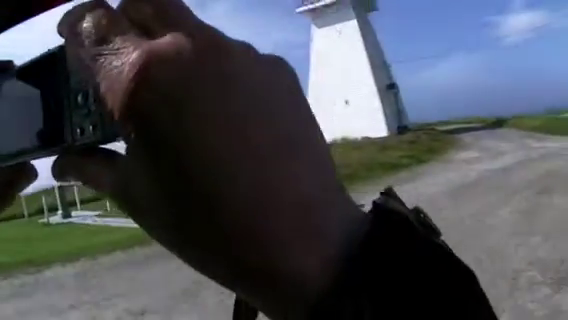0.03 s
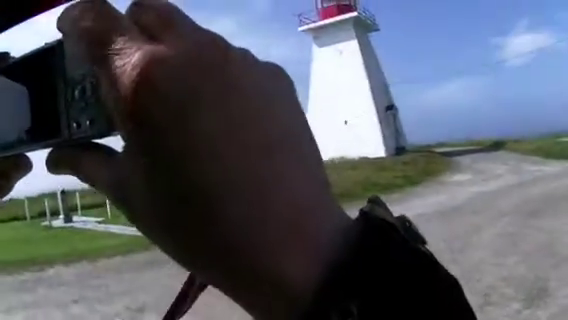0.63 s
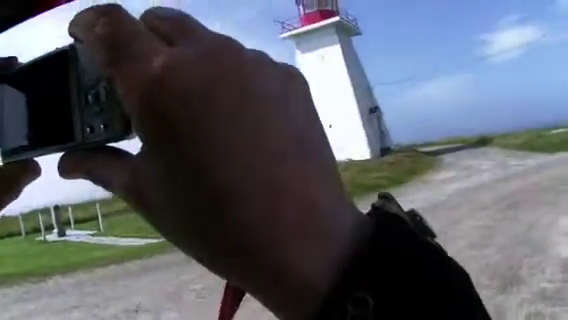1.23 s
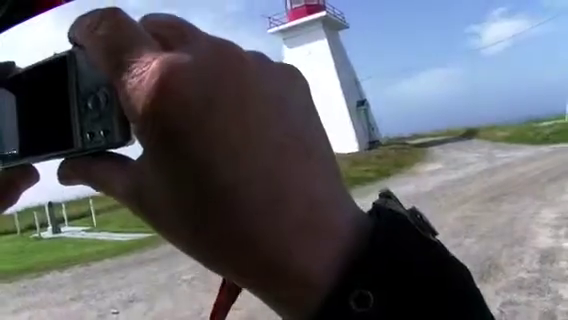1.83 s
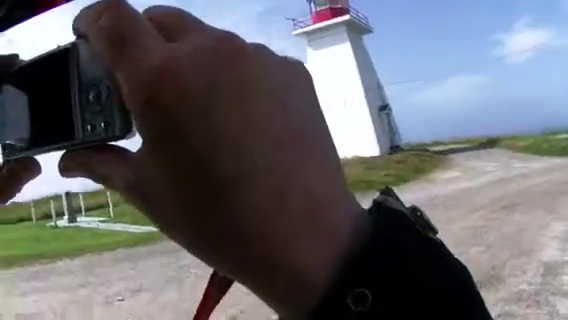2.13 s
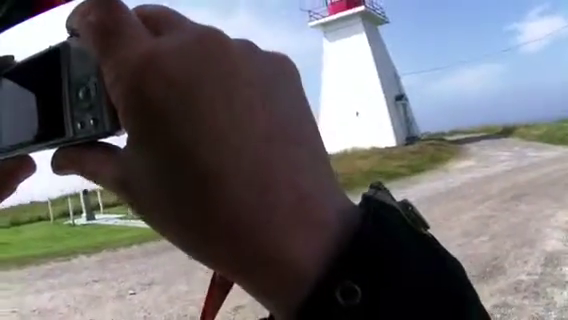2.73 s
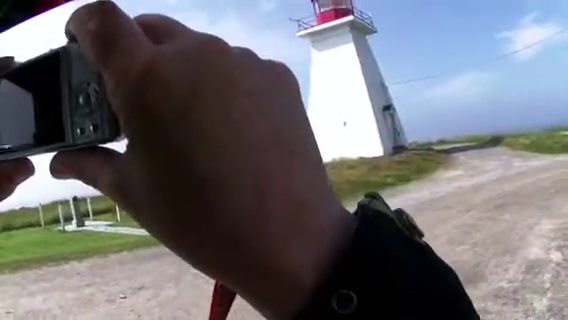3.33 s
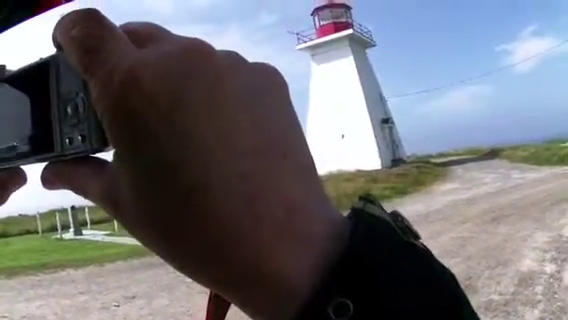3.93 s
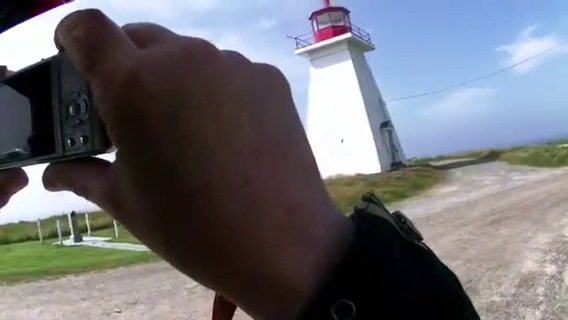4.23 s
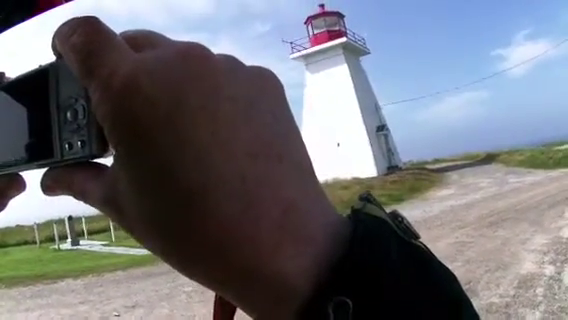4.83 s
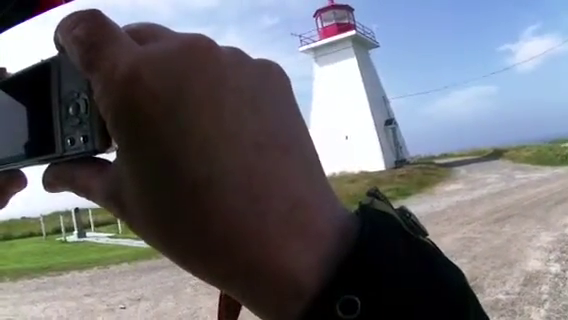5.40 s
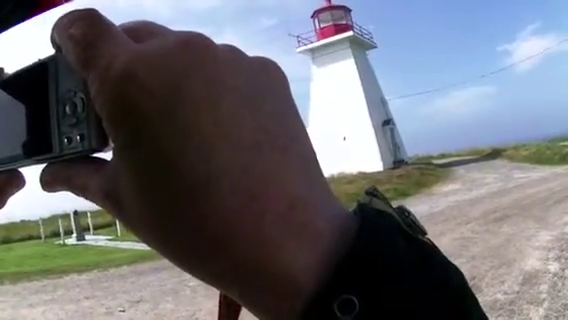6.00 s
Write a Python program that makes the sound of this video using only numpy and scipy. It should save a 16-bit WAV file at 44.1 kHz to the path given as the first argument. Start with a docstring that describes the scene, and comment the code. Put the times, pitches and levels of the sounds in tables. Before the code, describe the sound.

Low wind rumbles and flaps on the microphone from the start, rising and falling in small gusts over a very faint, steady wash of distant sea. At about 1.5 seconds a hand-held camera creaks once in the grip, a close, quick cluster of sharp clicks. The wind swells a little around 2.3 seconds. At about 2.7 seconds an electric fog horn starts with a slight stutter and holds one loud, low, nearly pure tone, with a thin whistle high above it. A quick reflection from a nearby wall thickens the blast, which grows slightly louder without changing pitch. The horn stops at about 4.7 seconds. A faint, pulsing echo of the same note comes back from the coast and slowly fades, while the wind keeps buffeting softly until the end at about 6 seconds.

```python
"""Fog horn by a lighthouse

An electric fog horn gives one two-second blast; a near wall and then the coast send it back.
Wind buffets the microphone over a faint wash of sea, and the hand-held camera creaks once in the grip.
The camera holds each sample of a slow clock, which puts a thin whistle high above the horn."""
import sys
import numpy as np
from scipy import signal
from scipy.fft import rfft, irfft
from scipy.io import wavfile
from scipy.ndimage import uniform_filter1d

SR = 44100
rng = np.random.default_rng(int(sys.argv[2]) if len(sys.argv) > 2 else 0)


def to_wav(sig):
    """Store sig (one row per channel, or 1-D mono) as 16-bit WAV at the path in sys.argv[1].

    Samples outside -1..1 are clipped; the rate is SR.
    """
    pcm = np.clip(np.atleast_2d(sig), -1, 1) * 32767
    pcm = np.round(pcm).astype(np.int16)
    wavfile.write(sys.argv[1], SR, pcm.T)  # frames by channels


N = 267246
T = np.arange(N) / SR
HORN_ON_S, HORN_OFF_S, HORN_HZ = 2.681, 4.681, 300   # the drive: one steady pitch between two times

# Colour of the far sea: (frequency [Hz], relative density [dB])
SEA_COLOUR = [(240, -32), (400, -2), (451, -4), (648, -4), (772, -5), (843, -6), (972, -5.5), (1480, -12.5),
              (4510, -19.5), (5500, -21.5), (7150, -58), (12100, -120)]
# Low end of the wind, from large eddies: (frequency [Hz], relative density [dB])
RUMBLE_COLOUR = [(20, -3), (30, 0.5), (45, -2), (65, 0.5), (85, -2.5), (110, -4.5), (140, -17), (180, -33)]
# Flapping of the smaller eddies: (frequency [Hz], relative density [dB])
EDDY_COLOUR = [(90, -9.5), (135, 4.5), (175, -0.5), (220, -5), (300, -8.5), (500, -25), (1000, -31.5),
               (2500, -52)]
# Air tearing at the edge of the case: (frequency [Hz], relative density [dB])
TEAR_COLOUR = [(150, -15), (300, 8.5), (500, 0.5), (950, -9), (1500, -22.5), (4000, -46.5)]
# Rise and fall of the wind on the microphone: (time [s], rumble level [dB], eddy level [dB])
WIND_LEVELS = [(0.0, -44.0, -56.0), (0.12, -53.5, -56.5), (0.22, -41, -51.5), (0.46, -44.5, -52),
               (0.62, -37, -46), (1.38, -47.0, -56.0), (1.46, -42.5, -47), (1.92, -38, -49.5),
               (2.32, -39.0, -42.0), (2.42, -33.5, -44.5), (2.66, -46.0, -56.5), (3.18, -42.0, -49.0),
               (3.8, -43.0, -53.5), (4.28, -38.5, -46.0), (4.64, -45.0, -52), (4.82, -40.5, -49.5),
               (5.26, -41.5, -50), (5.5, -41.5, -54), (5.82, -44, -51), (6.06, -53.5, -56)]
# Single eddies thumping the microphone: (time [s], eddy level [dB])
EDDY_THUMPS = [(0.831, -50), (3.18, -48.5), (3.57, -52.5), (5.02, -54), (5.26, -46.5)]
# Gusts that tear at the case: (crest time [s], level [dB], half length [s])
TEARING_GUSTS = [(0.045, -66.5, 0.13), (1.425, -60, 0.044), (2.299, -54.5, 0.23)]
# Single sharp puffs of air: (time [s], level [dB])
AIR_PUFFS = [(.237, -54), (.665, -53), (0.713, -53), (1.439, -48), (2.055, -45), (2.399, -55),
             (4.938, -48.5)]
# Skin rubbing on the case: (crest time [s], half length [s], slip level [dB])
SKIN_RUBS = [(1.536, 0.02, -36.5), (1.603, 0.017, -44.5)]
# The case snapping under the fingers: (time [s], jolt level [dB], ring-down [s])
CASE_SNAPS = [(1.5122, -37, .0001), (1.5501, -24.5, 0.00056), (1.5592, -16.5, 0.000026),
              (1.5661, -27, 0.000037), (1.5707, -29.5, .0007), (1.5748, -22, 0.000045),
              (1.5818, -22.5, 0.00099), (1.5854, -26.5, 0.00004)]
# Overtones of the diaphragm: (multiple of the pitch, base level against the tone [dB])
HORN_OVERTONES = [(2, -21), (3, -45), (4, -57.5), (5, -60), (8, -65), (10, -69)]
# Slow swell of the blast: (time [s], level before trim [dB])
HORN_SWELL = [(2.85, -20), (3.242, -20.5), (4.25, -18), (4.66, -19)]


def from_db(db):
    """Decibels to gain."""
    return 10 ** (np.asarray(db) / 20)


def rms_one(x):
    """Scale to rms 1."""
    return x / np.sqrt(np.mean(x ** 2) + 1e-20)


def evened(x):
    """Hold the rms at 1 over each tenth of a second; quick lumps stay."""
    return x / np.sqrt(uniform_filter1d(x ** 2, SR // 10) + 1e-9)


def envelopes(rows):
    """One envelope for each column after the time."""
    times, *columns = np.transpose(rows)
    return [np.interp(T, times, column) for column in columns]


def bump(at_s, half_s):
    """A smooth bell of height 1 in time."""
    return np.exp(-((T - at_s) / half_s) ** 2)


def low_pass(x, hz, order):
    """Butterworth low-pass."""
    return signal.sosfilt(signal.butter(order, hz, fs=SR, output="sos"), x)


def drift(rate_hz):
    """Smooth random modulation with rms 1."""
    step, run_in = 40, 2000
    pole = np.exp(-2 * np.pi * step * rate_hz / SR)
    white = rng.standard_normal(N // step + run_in + 2)
    slow = signal.lfilter([1], [1, -2 * pole, pole * pole], white)[run_in:]
    return np.interp(np.arange(N) / step, np.arange(len(slow)), rms_one(slow))


def noise(colour):
    """Noise of a given colour that rolls off beyond its ends; rms 1."""
    hz, db = np.transpose(colour)
    bins = np.maximum(np.arange(N // 2 + 1) * SR / N, 1)
    skirts = np.minimum(bins / hz[0], 1) ** 2 * np.minimum(hz[-1] / bins, 1) ** 2
    shape = from_db(np.interp(np.log(bins), np.log(hz), db))
    return rms_one(irfft(rfft(rng.standard_normal(N)) * skirts * shape, N))


def sea(level_db=-63.5, swell_db=.5):
    """A bed of far surf: a smooth wash that barely swells."""
    return from_db(level_db + swell_db * drift(2)) * noise(SEA_COLOUR)


def flutter(eddy_db, rest_db=-74, follow=.56, lumps_db=3.8, puff_rise_s=.0026, puff_fade_s=.009):
    """Air tears at the edge of the case, riding the eddies and flaring in gusts and sharp puffs."""
    tearing = from_db(rest_db + follow * (eddy_db - eddy_db.mean()))
    tearing += sum(from_db(db) * bump(s, half_s) for s, db, half_s in TEARING_GUSTS)
    puffs = sum(from_db(db) * np.exp(-np.maximum((s - T) / puff_rise_s, (T - s) / puff_fade_s))
                for s, db in AIR_PUFFS)
    return (tearing * from_db(lumps_db * drift(35)) + puffs) * noise(TEAR_COLOUR)


def wind(rumble_lumps_db=1.6, eddy_lumps_db=1.82, thump_bass_db=4.5):
    """Large eddies rumble on the microphone, smaller ones flap and thump, and flutter sits on top."""
    rumble_db, eddy_db = envelopes(WIND_LEVELS)
    thumps = sum(from_db(db) * bump(s, half_s=.017) for s, db in EDDY_THUMPS)
    rumbling = from_db(rumble_db + rumble_lumps_db * drift(21)) + from_db(thump_bass_db) * thumps
    flapping = from_db(eddy_db + eddy_lumps_db * drift(15)) + thumps
    top = flutter(eddy_db)
    return rumbling * evened(noise(RUMBLE_COLOUR)) + flapping * evened(noise(EDDY_COLOUR)) + top


def grip_creak(slips_per_s=740, slip_decay_s=.00007, uneven_db=4, scoop_hz=7500, scoop_share=.21):
    """Skin sticks and slips and the case snaps; both come through as one-sided jolts."""
    age = T[:SR // 100]
    slip_rate = slips_per_s * (1 + .033 * drift(200))
    ticks = np.diff(np.floor(np.cumsum(slip_rate) / SR), prepend=0)
    pressure = sum(from_db(db) * bump(s, half_s) for s, half_s, db in SKIN_RUBS)
    slips = ticks * pressure * from_db(uneven_db * rng.standard_normal(N))
    jolts = np.convolve(slips, np.exp(-age / slip_decay_s))[:N]
    for s, db, decay_s in CASE_SNAPS:
        at = round(s * SR)
        jolts[at:at + len(age)] += from_db(db) * np.exp(-age / decay_s)
    # the creak's clicks are softened around 7.5 kHz and dulled at the top
    treble_band = signal.lfilter(*signal.iirpeak(scoop_hz, Q=2.5, fs=SR), jolts)
    return -low_pass(jolts - scoop_share * treble_band, hz=12000, order=1)


def coast_echo(pitch_hz=299.3, wander_hz=.8, arrival_s=3.2, build_s=.93, base_db=-47, fade_db_per_s=4):
    """Far reflections merge into one wandering, fading tone; its two main paths beat."""
    beat_hz, trough_s, weaker_path = 3.1, 5.185, .55
    phase = 2 * np.pi * np.cumsum(pitch_hz + wander_hz * drift(6.5)) / SR
    fade_in = np.clip((T - arrival_s) / build_s, 0, 1)
    beating = np.abs(1 - weaker_path * np.exp(2j * np.pi * beat_hz * (T - trough_s)))
    level_db = base_db - fade_db_per_s * np.maximum(T - HORN_OFF_S, 0)
    return fade_in * beating * from_db(level_db) * np.sin(phase)


def wall_echo(blast, delay_s=.09593, level_db=-12, width_hz=27):
    """Slapback from the near wall, dulled to the fundamental and slightly smeared."""
    dull = signal.lfilter(*signal.iirpeak(HORN_HZ, HORN_HZ / width_hz, fs=SR), blast)
    return from_db(level_db) * np.interp(T - delay_s, T, dull, left=0)


def horn_overtones(phase, swing, age, waver_db=.48, brighten_db_per_s=.7):
    """The horn's edge: overtones surge and sink while the tone settles, then slowly brighten."""
    depth_db, crest_s, period_s, decay_s = 9, .012, .068, .058
    surge_db = depth_db * np.exp(-age / decay_s) * np.cos(2 * np.pi * (age - crest_s) / period_s)
    overtones = np.zeros(N)
    for multiple, db in HORN_OVERTONES:
        gain = from_db(db + waver_db * (multiple - .5) * drift(3.1))
        if multiple > 2:   # the higher ones grow as the diaphragm swings wider
            gain *= swing
        overtones += gain * np.sin(multiple * phase)
    return from_db(surge_db + brighten_db_per_s * (T - HORN_OFF_S)) * overtones


def horn(attack_s=.016, release_db_per_s=599.5, trim_db=-.34, waver_db=.22):
    """A driven diaphragm swings up, falters once, holds a nearly pure tone and rings out."""
    age = np.maximum(T - HORN_ON_S, 0)
    since_off = np.maximum(T - HORN_OFF_S, 0)
    # undriven, it rings flat: the drive pulls it up to pitch, and it sags back afterwards
    flat_hz, pull_in_s, sag_s = 13, .03, .015
    undriven = np.exp(-(age / pull_in_s) ** 4) + 1 - np.exp(-since_off / sag_s)
    phase = 2 * np.pi * np.cumsum(HORN_HZ - flat_hz * undriven) / SR
    attack = 1 - np.exp(-(age / attack_s) ** 2)
    swell_db, = envelopes(HORN_SWELL)
    falter = bump(at_s=2.726, half_s=.012)
    dip_db, dulling_db = -4.5, -5   # the falter ducks the whole horn, and its overtones further
    release_db = -release_db_per_s * since_off
    level = attack * from_db(swell_db + trim_db + dip_db * falter + release_db)
    brightness = from_db(dulling_db * falter + .5 * release_db)
    overtones = horn_overtones(phase, level / level.max(), age)
    tone = np.sqrt(2) * (np.sin(phase) + brightness * overtones)
    return tone * level * from_db(waver_db * drift(33))


def scene():
    """Horn, echoes, weather and handling in one mono mix."""
    blast = horn()
    return (blast + wall_echo(blast) + coast_echo() + wind() + sea() + grip_creak())[None]


def record(dry, clock_hz=12000, grain_db=-44.5, treble_leak_db=-15.5, cutoff_hz=15750):
    """Held samples mirror the sound around the clock rate; hiss rides on loud sound; the top is cut."""
    mix = dry[0]
    samples = signal.resample_poly(mix, clock_hz, SR, window=("kaiser", 8))
    held = signal.resample_poly(np.repeat(samples, 4), SR, 4 * clock_hz)[:N]
    treble = signal.sosfilt(signal.butter(6, 6800, "high", fs=SR, output="sos"), mix)
    loudness = np.sqrt(np.abs(low_pass(mix ** 2, hz=30, order=1)))
    hiss = from_db(grain_db) * loudness * rng.standard_normal(N)
    top_cut = signal.ellip(10, .1, 80, cutoff_hz, fs=SR, output="sos")
    return signal.sosfilt(top_cut, held + from_db(treble_leak_db) * treble + hiss)[None]


dry = scene()
out = record(dry)
to_wav(out)
```